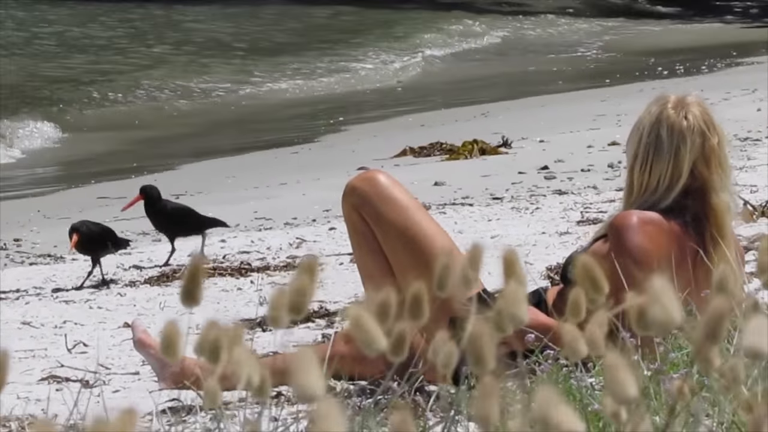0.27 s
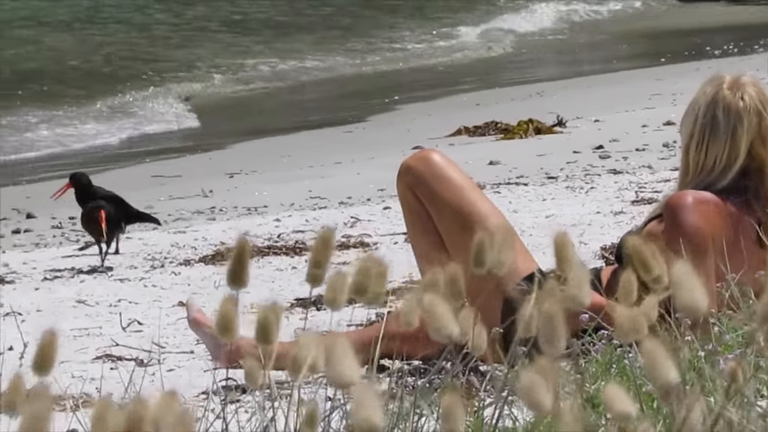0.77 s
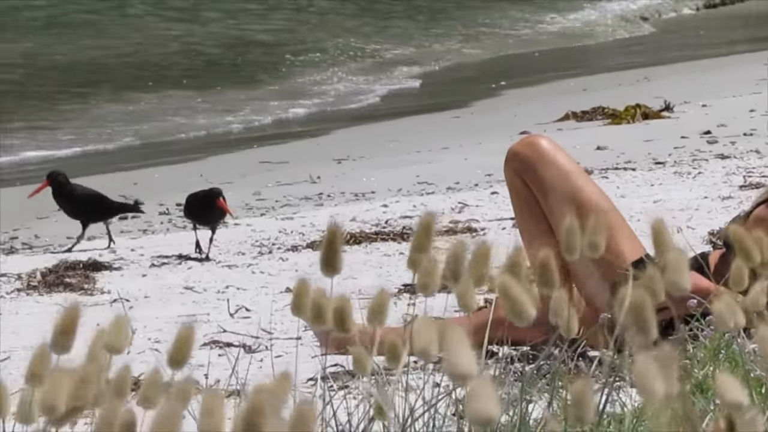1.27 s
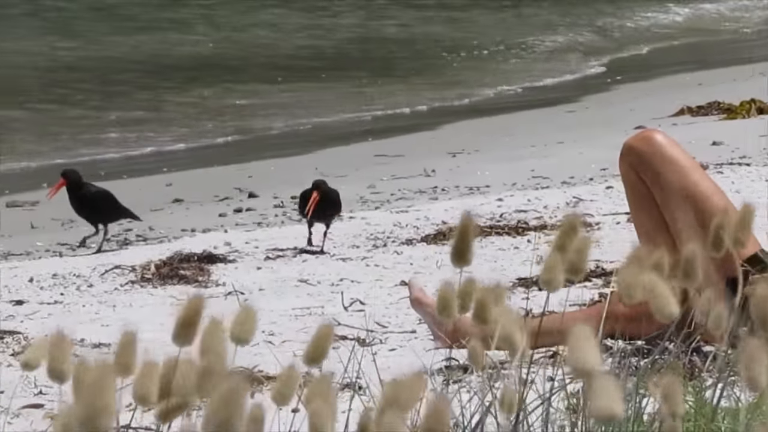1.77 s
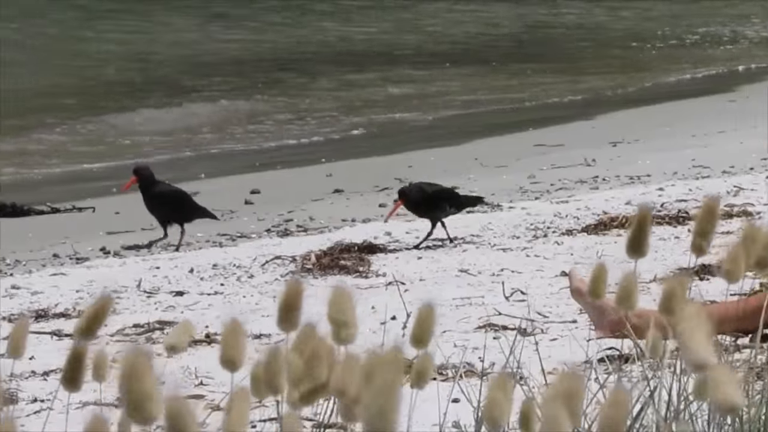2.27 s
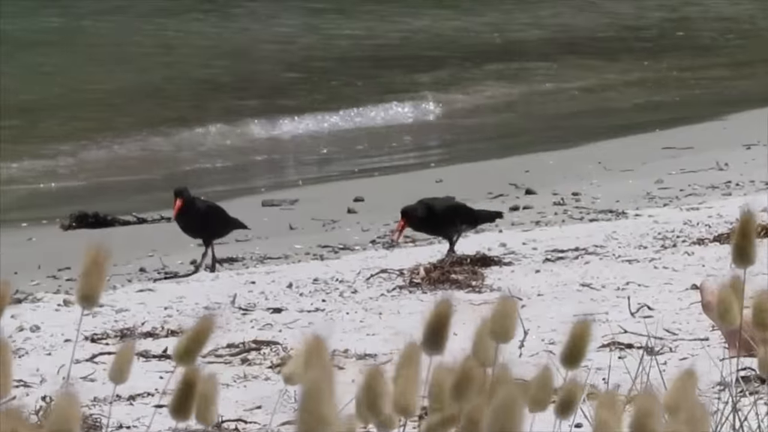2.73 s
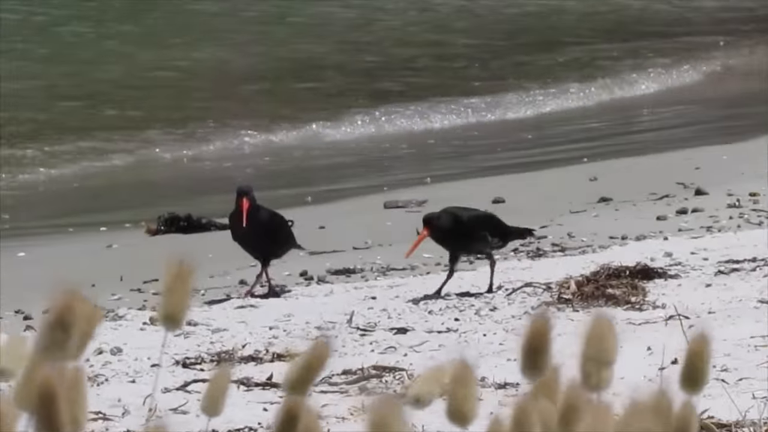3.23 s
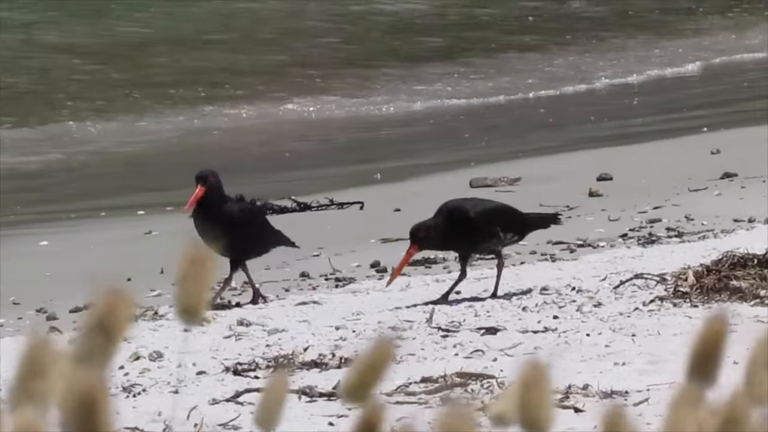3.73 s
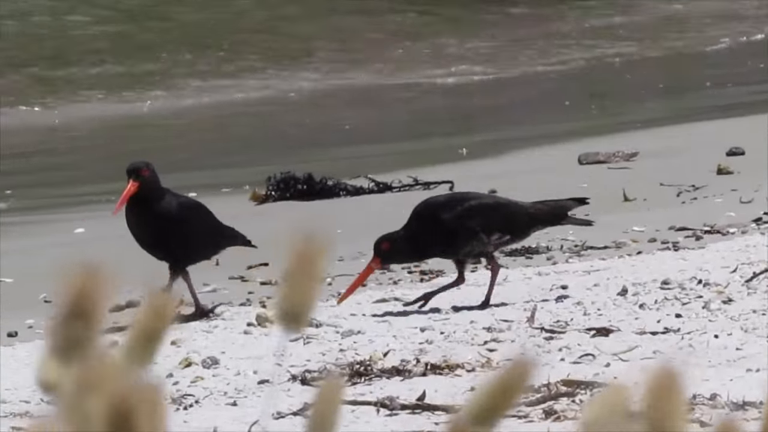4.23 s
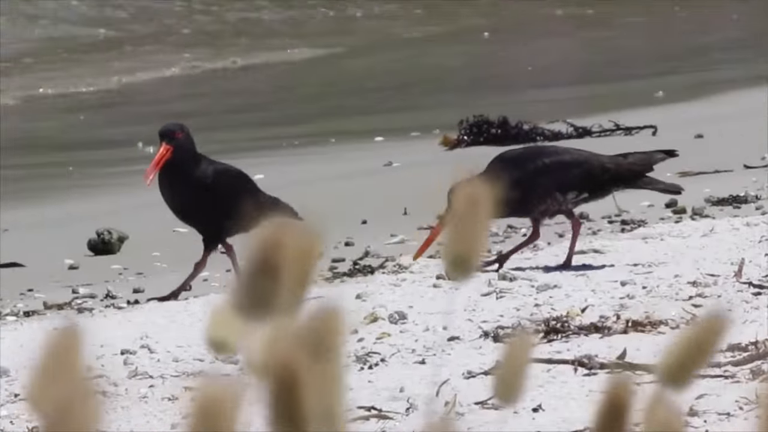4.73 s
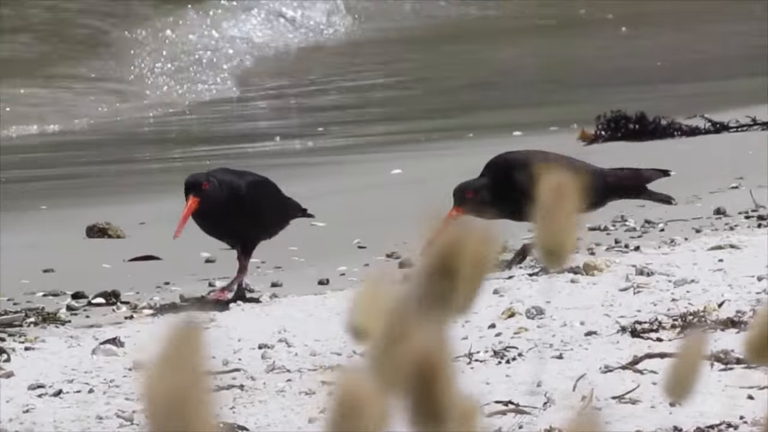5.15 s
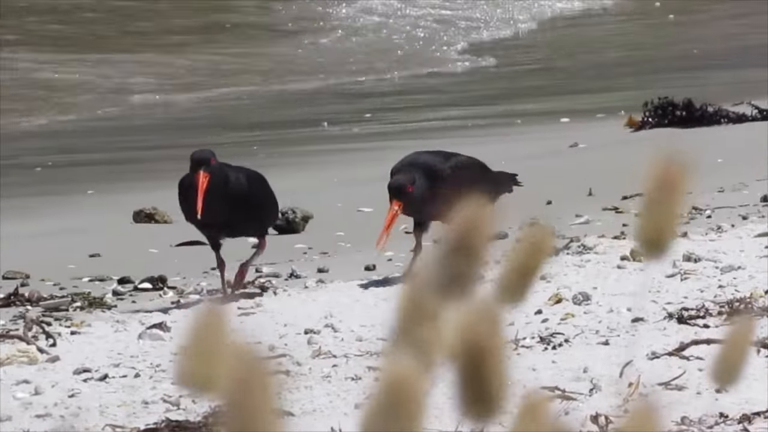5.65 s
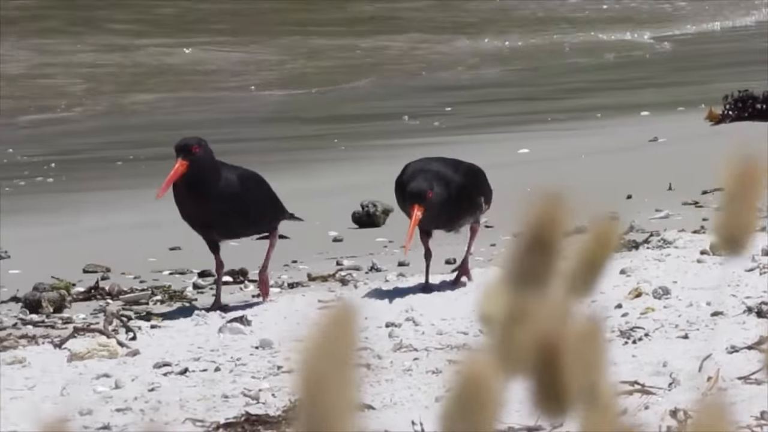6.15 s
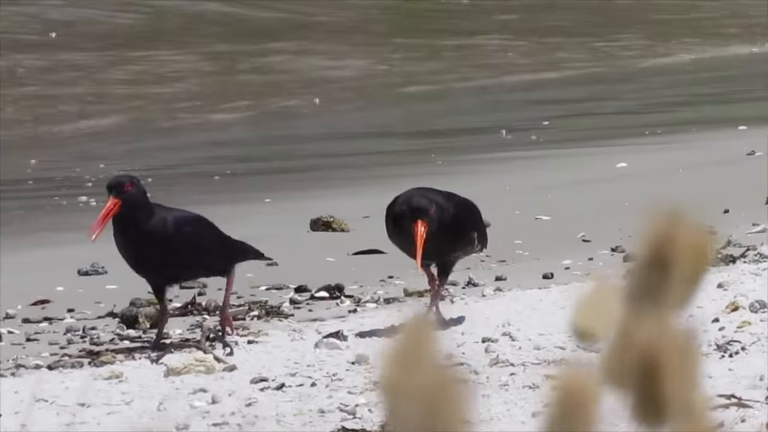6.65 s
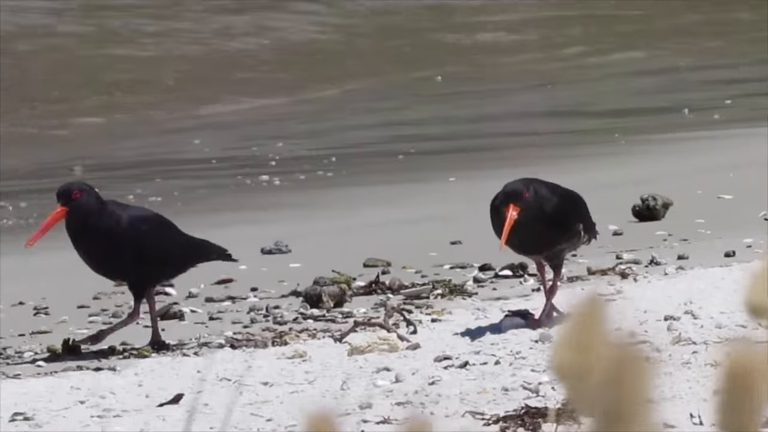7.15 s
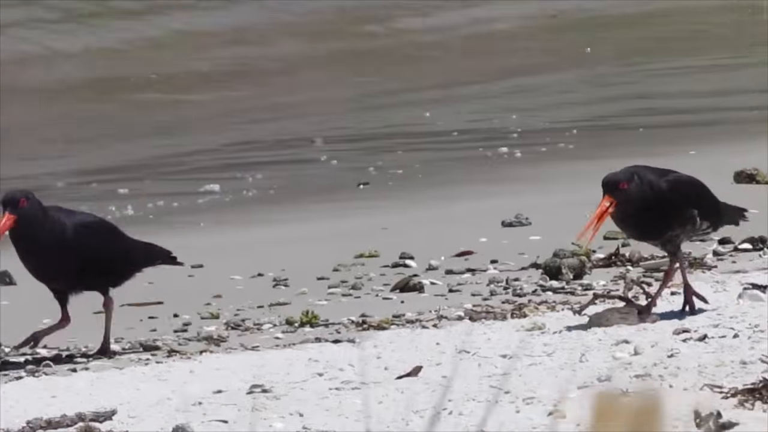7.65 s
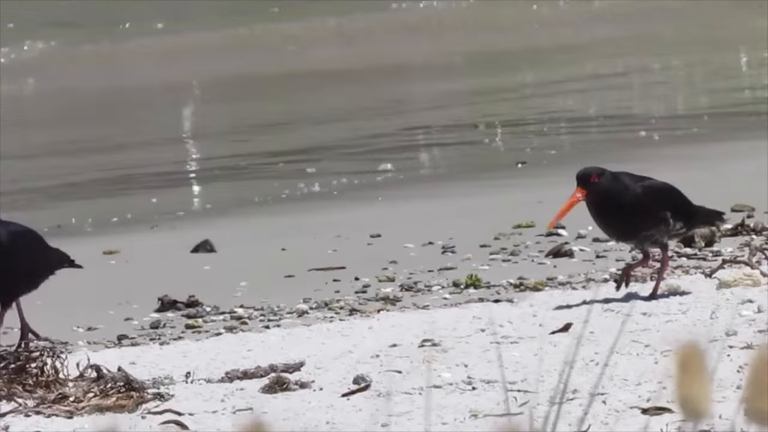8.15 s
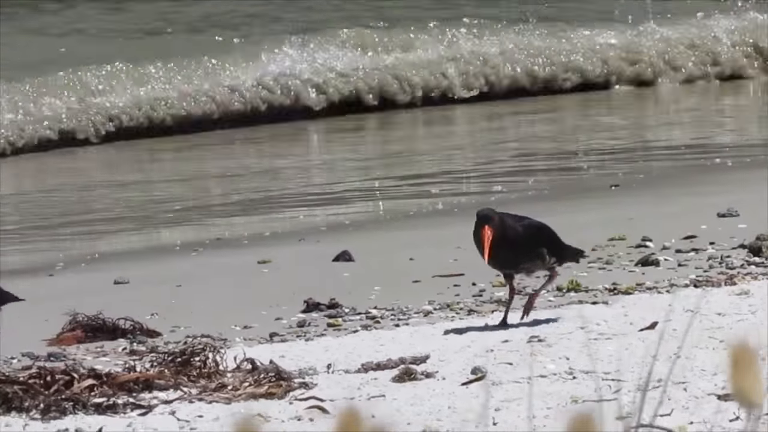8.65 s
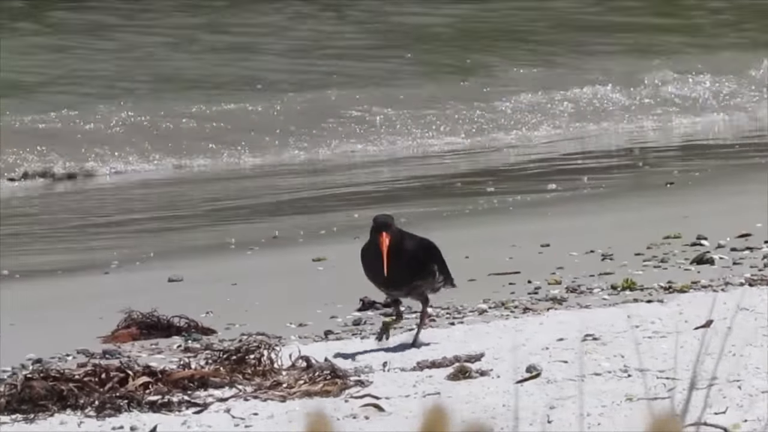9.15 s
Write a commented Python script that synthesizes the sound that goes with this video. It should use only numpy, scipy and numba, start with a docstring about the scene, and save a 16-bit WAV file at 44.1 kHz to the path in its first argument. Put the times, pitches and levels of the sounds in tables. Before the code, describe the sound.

Small waves break and drain on sand with a foamy hiss, heard through a hand-held stereo microphone. Right of centre, a pair of shorebirds trade sharp, arching whistles and short clipped notes, loudest in the later part. A faint songbird trills and chips farther back early on. Toward the end, low wind buffets hit the microphone as bubbles glug in the surf and the camera body ticks lightly.

```python
"""A shorebird's arching whistle over a breaking wave, heard from a hand-held stereo camera on a beach. Two
birds pipe in turn, most whistles led by a short kip, their harmonics shaped by windpipe and bill. A songbird
trills farther back. Small waves break on the sand, trapping bubbles that ring. At the camera itself, gusts
buffet mainly the left microphone port, the plastic body ticks and the microphones hiss faintly."""
import sys
import numpy as np
from scipy import signal
from scipy.io import wavfile
from scipy.ndimage import uniform_filter1d
from numba import njit

SR = 44100
rng = np.random.default_rng(int(sys.argv[2]) if len(sys.argv) > 2 else 0)


def dump(signal):
    """Clip the signal to [-1, 1] and save it as 16-bit WAV at the path in sys.argv[1]."""
    limited = np.clip(np.atleast_2d(signal).T, -1, 1)
    pcm = np.round(limited * 32767).astype(np.int16)
    wavfile.write(sys.argv[1], SR, pcm)


N = 414099

# The birds' long calls, right of centre. Each row: a curve and a facing. Each curve point: time in
# seconds, second partial in Hz, its level in dB. Each facing, all in dB: lowest partial, overtones,
# treble at the start, treble at the end, left minus right, the same in the treble.
WHISTLES = [
    [[(0, 2390, -41), (.05, 2730, -44), (.075, 2950, -48), (.14, 2900, -59), (.155, 2704, -43),
     (.214, 2650, -44), (.27, 2560, -38), (.3, 2050, -52)], (9, -6, 15, 5, -6, 3)],
    [[(.55, 2050, -55.5), (.6, 2480, -43), (.63, 2465, -36), (.665, 2610, -44), (.69, 2640, -58),
     (.8, 2570, -61), (.815, 2550, -42), (.9, 2420, -42), (.96, 2356, -38.5), (.985, 2070, -51)],
     (-10.5, -2, -8.5, -7, -5, 12)],
    [[(.695, 2100, -45), (.74, 2600, -36.5), (.75, 3010, -37), (.77, 3110, -44), (.79, 3460, -46),
     (.83, 3470, -55), (.855, 3050, -42), (.87, 2880, -33), (.88, 2660, -31), (.93, 2574, -35),
     (.96, 2420, -38), (.98, 2150, -50)], (1, -18, -18, -2, -4.5, 0)],
    [[(1.585, 2063, -50), (1.62, 2166, -46), (1.65, 2380, -41), (1.68, 2288, -42), (1.72, 2525, -37.5),
     (1.79, 2740, -42), (1.83, 2756, -34), (1.9, 2470, -40), (1.98, 2330, -42), (2.02, 2200, -44),
     (2.035, 1950, -58)], (8, -11, -15, -10, -4, 10)],
    [[(1.68, 2103, -52), (1.72, 2297, -46), (1.77, 2703, -39), (1.81, 2744, -36), (1.83, 3000, -43),
     (1.855, 2810, -43), (1.87, 2650, -37), (1.96, 2560, -32), (1.978, 2415, -39)],
     (4.5, -15, -3, -3, -5.5, -1)],
    [[(1.98, 2500, -52), (2.03, 2770, -54), (2.1, 2685, -50.5), (2.26, 2500, -62)], (-2, -12, 0, -8, -7, 0)],
    [[(2.664, 2360, -43), (2.675, 2275, -41), (2.705, 2426, -40.5), (2.74, 2840, -39), (2.75, 3140, -46),
     (2.77, 3290, -58), (2.795, 3106, -44), (2.87, 3000, -40), (2.885, 2740, -38.5), (2.93, 2640, -36.5),
     (2.98, 2510, -41.5), (3.0, 2260, -44)], (6, -22, -2, -2, -4, -2)],
    [[(3.25, 2040, -52), (3.274, 2027, -52), (3.288, 2170, -44.5), (3.318, 2240, -38), (3.354, 2428, -36),
     (3.428, 2477, -36.5), (3.468, 2505, -35), (3.59, 2468, -33), (3.698, 2310, -37), (3.718, 2030, -47)],
     (2.5, -2, -12, -5, -5.5, -1)],
    [[(4.534, 2140, -37), (4.568, 2386, -33.5), (4.59, 2597, -30.5), (4.622, 2660, -31.5),
     (4.66, 2610, -30.5), (4.702, 2853, -40), (4.73, 2800, -40), (4.762, 2580, -29), (4.858, 2443, -34),
     (4.886, 2300, -42), (4.912, 2230, -36), (4.938, 2060, -51)], (-4, -2, -14, -20, -6.5, 5)],
    [[(5.627, 2145, -37), (5.664, 2390, -34.5), (5.726, 2517, -29.5), (5.8, 2544, -31.5),
     (5.9, 2503, -33.5), (6.03, 2336, -35), (6.062, 2150, -39)], (-6, 0, -6, -3, -4.5, 6)],
    [[(5.78, 2075, -46), (5.826, 2416, -31), (5.885, 2614, -32.5), (6.05, 2473, -36), (6.08, 2170, -39.5)],
     (2, -4.5, -1, 7, -6.5, -4)],
    [[(6.58, 1763, -58), (6.605, 2060, -45), (6.64, 2435, -31), (6.67, 2720, -30), (6.688, 2780, -30.5),
     (6.696, 3026, -32.5), (6.74, 2934, -31.5), (6.77, 2950, -29), (6.782, 2673, -26), (6.89, 2573, -26.5),
     (6.905, 2470, -24), (6.922, 2066, -41)], (-3, -6.5, 6.5, 7, -6, 0.5)],
    [[(6.655, 2037, -34), (6.67, 2012, -39), (6.7, 2295, -35), (6.8, 2430, -30), (6.84, 2510, -33),
     (6.92, 2400, -30), (7.0, 2465, -29.5), (7.09, 2323, -29.5), (7.12, 1950, -49)],
     (-1, -1, 4, -6, -5, 1.5)],
    [[(7.43, 1813, -53), (7.454, 2110, -44), (7.474, 2370, -33), (7.492, 2609, -27.5), (7.534, 2635, -25),
     (7.575, 2777, -23.5), (7.644, 2683, -23), (7.662, 2570, -22.5), (7.672, 2627, -25.5),
     (7.684, 2510, -23), (7.722, 2536, -23.5), (7.764, 2417, -25.5), (7.778, 2305, -33.5),
     (7.787, 2080, -37)], (-4, -3, 5, 11.5, -6.5, 2)],
    [[(8.297, 2170, -43), (8.33, 2330, -36), (8.35, 2480, -35), (8.38, 2323, -34), (8.43, 2456, -32),
     (8.46, 2540, -32), (8.55, 2550, -32), (8.585, 2380, -35), (8.605, 2540, -34.5), (8.7, 2260, -34),
     (8.715, 2130, -43)], (4, -7, -5, -8, -3.5, -11)],
    [[(8.515, 2100, -48), (8.55, 2520, -28), (8.578, 2723, -30), (8.59, 2930, -29), (8.61, 2966, -26),
     (8.62, 3090, -32), (8.69, 3043, -30.5), (8.72, 2715, -27.5), (8.735, 2850, -27), (8.745, 2690, -28.5),
     (8.82, 2630, -28), (8.852, 2220, -38.5)], (-3.5, -6, -3.5, 14, -6.5, 0.5)],
    [[(9.365, 2220, -36), (9.4, 2250, -36)], (0, -2, 5, 6, -3, 0)],
]
def whistles():
    """The nearest voices: whistles climb, step up and down and sag, the pitch a little unsteady."""
    out = np.zeros((2, N))
    for curve, facing in WHISTLES:
        times, second_hz, db = np.array(curve).T
        t = np.arange(times[0], times[-1], 1 / SR)
        hz = np.interp(t, times, second_hz / 2) * (1 + 0.00209 * walk(39.9, len(t)))
        hz = uniform_filter1d(hz, 200, mode="nearest")  # round the corners
        db = uniform_filter1d(np.interp(t, times, db), 200, mode="nearest")
        source_db = db - at(THROAT, 2 * hz)
        add(out, times[0], voice(hz, source_db, facing, fade_s=0.00083, rasp=0.0039, flutter_db=0.39))
    return out


# The same birds' short notes. Each row: start and length in seconds, starting and top pitch in Hz,
# level before the throat in dB, treble gain in dB, fade as the pitch drops in dB.
KIPS = [(0.512, 0.026, 2070, 2080, -38, 2, 30), (0.627, 0.046, 1086, 2020, -35, 0, 21),
        (1.554, 0.038, 2020, 2030, -36, -15, 25), (1.63, 0.042, 1150, 1800, -40, -9, 16),
        (2.618, 0.054, 1086, 1940, -36, -6, 12), (3.23, 0.022, 1850, 1830, -29.5, -12, 23),
        (4.506, 0.029, 2077, 2093, -28, 17.5, 21), (5.584, 0.035, 1105, 1450, -42, -6, 60),
        (5.605, 0.023, 2080, 2040, -28.5, 11, 22), (6.533, 0.043, 1096, 1880, -32.5, 8, 8),
        (6.61, 0.038, 1060, 1390, -43, 6, 57), (6.625, 0.029, 2040, 2020, -31, 9, 8),
        (7.383, 0.041, 1053, 1785, -27, -1.5, 12.5), (8.257, 0.048, 1065, 1435, -39, -18, 8),
        (8.443, 0.042, 1040, 1800, -30, -10, 8), (9.32, 0.045, 1033, 1843, -25.5, -3, 20),
        (9.35, 0.028, 2000, 1955, -31.5, 4.5, 12)]
def kips(end_hz=1110):
    """Raspy, hollow notes that arch up, or start at the top, and then fall."""
    out = np.zeros((2, N))
    for start, length, start_hz, top_hz, db, treble_db, fade_db in KIPS:
        u = np.linspace(0, 1, int(length * SR))
        climb_left = np.clip(1 - u / .35, 0, 1) ** 1.1
        fall = np.clip((u - .35) / 0.58, 0, 1) ** 2.4
        hz = top_hz - (top_hz - start_hz) * climb_left - (top_hz - end_hz) * fall
        leap = top_hz / start_hz
        source_db = db - fade_db * fall - 9 * climb_left * (leap - .8)
        overtone_db = 0.54 * treble_db - 2 - 11 * (leap - 1)
        facing = (-11, overtone_db, treble_db, treble_db + 2, -2.5, 2.5)
        kip = voice(hz, source_db, facing, fade_s=0.001, rasp=.006, flutter_db=3.5, hollow_db=-9)
        add(out, start, kip)
    return out


# Resonance of windpipe and bill. Each row: frequency in Hz, gain in dB.
THROAT = [(900, -56), (1250, -15.5), (1750, -2), (2100, 0), (2600, 4), (3100, 1.5), (3450, -7), (5000, -9),
          (6000, -12.5), (6800, -10.5), (8000, -15), (11000, -15), (13000, -25), (14500, -61), (16000, -49)]
def voice(hz, source_db, facing, fade_s, rasp, flutter_db, hollow_db=0):
    """Harmonics pass through the throat; how the bill points sets colour and side at the microphone."""
    low_db, overtone_db, first_db, last_db, pan_db, treble_pan_db = facing
    n = len(hz)
    colour = [(1800, low_db), (2100, 0), (3100, 0), (3700, overtone_db), (5000, overtone_db),
              (6300, 0.022)]
    treble_share = [(5000, 0.009), (6300, 0.91), (8000, 0.84), (11500, 1.05)]
    treble_db = np.linspace(first_db, last_db, n)  # the head turns while calling
    dulling_db = .35 * (source_db - source_db.max())  # softer moments are also duller
    phase = 2 * np.pi * np.cumsum(hz * (1 + rasp * walk(400, n) + 0.0024 * walk(89.9, n))) / SR
    out = 0
    for k in range(1, 14):
        partial_hz = k * hz
        db = source_db + at(THROAT, partial_hz) + at(colour, partial_hz)
        db += treble_db * at(treble_share, partial_hz)
        db += dulling_db * np.clip(np.log2(partial_hz / 3500), 0, 1)
        db += hollow_db * np.exp(-((partial_hz - 6100) / 900) ** 2)
        db += min(0.44 * k, 3) * walk(60.3, n) + 2.44 * (k != 2) * walk(15.7, n)  # each partial wavers
        db += flutter_db * walk(231, n)
        beam = np.clip(np.log2(partial_hz / 3000), 0, 1)  # higher partials beam more narrowly
        lag = -0.12 * beam * np.array([[1], [-1]])  # treble reaches the two ports out of step
        pan = sides(pan_db + beam * (treble_pan_db - pan_db))
        out = out + undb(db) * pan * np.sin(k * phase + lag + 2 * np.pi * rng.random())
    edge_s = np.minimum(np.arange(n), np.arange(n)[::-1]) / SR
    return np.sqrt(2) * out * np.clip(edge_s / fade_s, 0, 1)


# Small waves on the sand. Each row: crest time, build, hold and release in seconds, then breaker rumble, wash
# and foam hiss in dB.
WAVES = [(0.0, .1, 0.031, 1, -34.5, -37.5, -41.5), (0.487, 0.46, 0.088, 0.46, -45, -39, -39.5),
         (0.789, 0.28, 0.046, 0.53, -48, -47, -47), (1.35, 0.89, 0.041, 0.8, -50, -44.5, -47.5),
         (2.142, 0.37, 0.016, 0.22, -44, -52, -61), (2.65, 0.36, 0.33, 0.35, -40.5, -51, -62.5),
         (4.106, 0.4, .2, .3, -47, -56, -67.5), (4.412, 0.15, 0.2, 0.39, -51, -45, -48),
         (4.727, 0.5, 0.56, 0.69, -41, -41, -42), (5.642, 0.94, 0.14, 0.48, -41.5, -39, -43),
         (6.565, 0.26, 0.19, 0.61, -46.5, -48.5, -56), (7.233, 0.48, 0.21, 0.23, -38.5, -45, -44),
         (7.6, 0.18, .02, 0.73, -43, -46, -43), (8.056, 0.72, 0.23, 0.43, -39, -40.5, -48),
         (8.55, 0.38, 0.31, 0.35, -40, -44, -53.5), (9.28, 0.85, .1, .2, -46, -48, -58)]
# The waterline between waves: rumble, wash and foam in dB.
LULL_DB = (-46, -53.5, -62.5)
def waves(t):
    """Rumble, wash and foam levels in dB: each wave builds out of the lull, holds and dies back."""
    lull = np.array(LULL_DB)[:, None]
    db = lull + np.zeros_like(t)
    for crest, build, hold, release, *top_db in WAVES:
        height = np.interp(t, [crest - build, crest, crest + hold, crest + hold + release], [0, 1, 1, 0])
        db = np.maximum(db, lull + height * (np.array(top_db)[:, None] - lull))
    return db


# Where far sea, rumble, wash and foam sit in the spectrum, each in Hz.
SURF_CENTRES_HZ = [50, 300, 3500, 10000]
# Tone of the surf from the beach. Each row: frequency in Hz, gain of that third octave in dB.
SURF_COLOUR = [(30, -9.5), (60, -14.5), (125, -10.5), (250, -9.5), (500, -12.5), (1000, -5.5), (1800, -5),
               (2500, -2), (4000, 0), (5600, 0), (8000, 4.5), (10000, 4), (13000, -0.5), (16100, -40)]
# Width of the surf at the microphones. Each row: frequency in Hz, left-right correlation.
SURF_LIKENESS = [(60, 0.5), (130, 1), (350, 0.81), (700, 0.97), (1400, 0.68), (2800, 0.1), (4000, 0.56),
                 (8000, 0.8), (15000, 0.17)]
# Side the surf leans to. Each row: frequency in Hz, left minus right in dB.
SURF_BALANCE = [(60, -7), (110, -3.5), (380, -1.5), (1290, 0.5), (2380, 2.5), (4400, 6.5), (8120, 3),
                (15000, 4)]
def surf(far_sea_db=-55):
    """Noise bands follow the waves over a steady far swell, flicker and crackle with bursting bubbles."""
    levels = np.vstack([np.full(N, far_sea_db), waves(np.arange(N) / SR)])
    surge_db = walk(9)
    pops = (rng.random(N) < 900 / SR) * undb(3.9 * rng.exponential(size=N))
    crackle = signal.lfilter([1], [1, -np.exp(-1 / (0.0011 * SR))], pops)
    out = np.zeros((2, N))
    for hz in 25 * 2 ** np.arange(0, 9.4, 1 / 3):
        grain = np.sqrt(1 + at([(3000, .15), (10000, 0.63)], hz) * crackle)  # the treble crackles most
        mid, side = (noise_band(hz, hz / 3, grain) for _ in range(2))
        weights = np.array([at(list(zip(SURF_CENTRES_HZ, layer)), hz) for layer in np.eye(len(levels))])
        db = weights @ levels + at(SURF_COLOUR, hz) + surge_db + 1.68 * walk(13)
        likeness = min(at(SURF_LIKENESS, hz), .95)
        mid *= np.sqrt((1 + likeness) / 2)
        side *= np.sqrt((1 - likeness) / 2)
        left = mid + side
        right = np.roll(mid - side, 6 if hz < 3400 else 2)  # the left port hears the water sooner
        out += undb(db) * sides(at(SURF_BALANCE, hz)) * np.array([left, right])
    return out


# Large bubbles trapped by a breaker. Each row: start in seconds, starting pitch in Hz,
# decay length in cycles, level in dB.
GLUGS = [(7.037, 377, 4.5, -21), (7.305, 298, 8.3, -24.5), (8.03, 730, 28, -29.5), (8.113, 414, 7.7, -24.5),
         (8.126, 229, 8.7, -24.5), (8.179, 308, 16, -27.5), (8.245, 674, 13.5, -28.5),
         (2.901, 212, 8, -30.5), (4.7, 237, 12, -29)]
def glugs(small_count=260):
    """Bubbles ring briefly and rise in pitch; small ones come at random and follow the rumble's level."""
    chance = rng.random((small_count, 4))
    starts = chance[:, 0] * N / SR
    pitches = 160 * 5.9 ** chance[:, 1]
    decays = 4 + 9 * chance[:, 2]
    levels = waves(starts)[0] + 1.9 - 1.4 * np.log(chance[:, 3])
    out = np.zeros((2, N))
    for start, hz, cycles, db in GLUGS + list(zip(starts, pitches, decays, levels)):
        u = np.arange(0, 2, hz / cycles / SR)
        envelope = np.exp(-2.4 * u) * np.clip(u / 0.064, 0, 1)
        add(out, start, undb(db) * envelope * np.sin(2 * np.pi * cycles * (u + 0.135 * u ** 2)))
    return out


# Gusts reaching the camera. Each row: time in seconds, hold in seconds, level in dB before port gain.
GUSTS = [(2.45, .7, -57), (4.53, 0.027, -43.5), (4.61, 0.027, -44), (4.686, .025, -36), (4.73, 0.017, -42),
         (4.897, .02, -46), (5.82, .05, -48), (6.68, 0.13, -46.5), (6.845, 0.056, -42.5),
         (7.145, 0.051, -30.5), (7.226, 0.029, -20.5), (7.415, .01, -37.5), (7.477, 0.56, -37.5),
         (7.56, 0.012, -24.5), (7.673, 0.023, -29), (7.743, 0.048, -28.5), (7.834, 0.026, -31.5),
         (7.932, 0.028, -31), (8.118, 0.058, -35), (8.37, 0.14, -45), (8.53, 0.051, -43.5),
         (8.767, .01, -38.5), (8.85, 0.11, -34), (9.031, 0.089, -33.5), (9.196, 0.12, -45.5)]
def wind(breeze_db=-62.5, rise_db_per_s=304, fall_db_per_s=249):
    """Over a wavering breeze, eddies thump each port on its own, mostly the windward left one."""
    t = np.arange(N) / SR
    db = breeze_db + 5 * walk(12)
    for arrival, hold, top_db in GUSTS:
        before, after = (arrival - t).clip(0), (t - arrival - hold).clip(0)
        db = np.maximum(db, top_db - rise_db_per_s * before - fall_db_per_s * after)
    ports = []
    for port_db in (5.5, -8):
        eddies = rng.standard_normal(N) * undb(1.55 * walk(25))
        thump = unit(bandpass(bandpass(eddies, 62., 110.), 80., 160.))
        rush = undb(-23) * unit(bandpass(eddies, 300., 440.))
        ports.append(undb(db + port_db) * (thump + rush))
    return np.array(ports)


# The camera in the hand, right at the microphones. Each row: start in seconds, peak in dB,
# centre in Hz, left minus right in dB.
TICKS = [(2.537, -20.5, 700, 3), (2.648, -23, 597, -7), (2.66, -36, 2400, 0), (3.171, -27, 2440, -6),
         (8.293, -25, 5500, -1), (7.278, -26, 4600, 12), (7.316, -31, 3600, 12), (7.375, -27, 4400, 14),
         (7.744, -17.5, 1500, 5), (7.838, -32, 680, 1), (8.747, -21, 700, -4)]
def camera_ticks():
    """Short dull plastic ticks: a burst of noise around the pitch of each."""
    out, t = np.zeros((2, N)), np.arange(0, .03, 1 / SR)
    for start, db, hz, pan_db in TICKS:
        burst = rng.standard_normal(len(t)) * np.exp(-t / 0.0067)
        tick = bandpass(bandpass(burst, float(hz), 1400.), float(hz), 2700.)
        add(out, start, sides(pan_db) * undb(db) * tick / np.abs(tick).max())
    return out


# A songbird behind the shorebirds. Each row: start and end in seconds, pitch in Hz at the start, before
# the final drop and at the end, warbles a second, sweep scale in Hz, starting and ending level in dB.
TRILLS = [(0.752, 0.986, 4700, 4390, 3800, 67, 300, -41, -47),
          (2.922, 3.219, 4700, 4370, 3870, 73, 250, -49, -45),
          (3.363, 3.47, 4200, 4120, 4040, 70, 250, -56, -57),
          (3.707, 3.948, 4700, 4600, 3930, 78, 400, -59, -37.5),
          (9.243, 9.28, 4000, 3890, 3720, 56, 30, -57, -52)]
# Its falling chips. Each row: start in seconds, final pitch in Hz, level in dB.
CHIPS = [(4.048, 4700, -51), (4.068, 4750, -41), (4.089, 4500, -42), (4.111, 4000, -40), (4.135, 3900, -48),
         (4.159, 3800, -49), (4.183, 3650, -51), (4.208, 3500, -52)]
def songbird(chip_s=0.011, chip_fall_hz=2000, chip_fall_s=0.0026):
    """Just left of centre: trills that warble ever wider, loudest low in the sweep, and a run of chips."""
    out = np.zeros((2, N))
    for start, end, start_hz, late_hz, end_hz, rate, sweep_hz, start_db, end_db in TRILLS:
        t = np.arange(0, end - start, 1 / SR)
        u, warble = t / t[-1], 2 * np.pi * rate * t
        hz = np.interp(u, [0, .75, 1], [start_hz, late_hz, end_hz])
        hz += sweep_hz * (0.42 + 0.5 * u) * np.cos(warble)
        pulse = 1 - (.8 - 0.62 * u) * np.cos(warble + 0.63)
        fade = np.clip(np.minimum(u, 1 - u) / 0.058, 0, 1)
        db = start_db + u * (end_db - start_db) + walk(94, len(t))
        add(out, start, undb(db) * pulse * fade * np.sin(2 * np.pi * np.cumsum(hz) / SR))
    t = np.arange(0, chip_s, 1 / SR)
    envelope = np.sin(np.pi * (t / chip_s) ** 1.3)
    for start, end_hz, db in CHIPS:
        hz = end_hz + chip_fall_hz * np.exp(-t / chip_fall_s)
        add(out, start, undb(db) * envelope * np.sin(2 * np.pi * np.cumsum(hz) / SR))
    return out * sides(1.5)


def microphone_hiss():
    """The microphones' own faint treble noise, unrelated left and right."""
    return undb(-54) * np.array([noise_band(hz=11000., width_hz=5000.) for _ in range(2)])


def undb(db):
    return 10 ** (np.asarray(db) / 20)


def at(table, hz):
    """Read (Hz, value) points on a log-frequency axis."""
    points_hz, values = np.array(table).T
    return np.interp(np.log(hz), np.log(points_hz), values)


def unit(x):
    return x / np.sqrt(np.mean(x ** 2))


def sides(pan_db):
    """Left and right gains, pan_db apart."""
    return undb(np.vstack([pan_db, -pan_db]) / 2)


@njit
def bandpass(x, hz, width_hz):
    """State-variable band-pass, gain 1 at the centre."""
    y, band, low = np.empty(len(x)), 0., 0.
    g, damping = np.tan(np.pi * hz / SR), width_hz / hz
    for i in range(len(x)):
        v = (band + g * (x[i] - low)) / (1 + g * (g + damping))
        band, low, y[i] = 2 * v - band, low + 2 * g * v, damping * v
    return y


def noise_band(hz, width_hz, grain=1):
    """Noise scaled by grain and band-passed twice, at unit RMS."""
    return unit(bandpass(bandpass(grain * rng.standard_normal(N), hz, width_hz), hz, width_hz))


def walk(rate, count=N):
    """Random levels held 1 / rate s and smoothed twice; spread near 1."""
    hold = int(SR / rate)
    steps = np.repeat(rng.standard_normal(count // hold + 1), hold)
    return np.sqrt(2) * uniform_filter1d(uniform_filter1d(steps, hold), hold)[:count]


def add(out, start_s, sound):
    """Mix a mono or stereo sound into both channels."""
    i = int(start_s * SR)
    out[:, i:i + sound.shape[-1]] += sound[..., :max(N - i, 0)]


def scene():
    """The beach from where the camera is held."""
    birds = whistles() + kips() + songbird()
    return birds + camera_ticks() + surf() + glugs() + wind() + microphone_hiss()


def record(dry, top_hz=15750):
    """The recorder cuts the top steeply."""
    return signal.sosfilt(signal.ellip(10, .2, 80, top_hz, fs=SR, output="sos"), dry)


dry = scene()
out = record(dry)
dump(out)
```